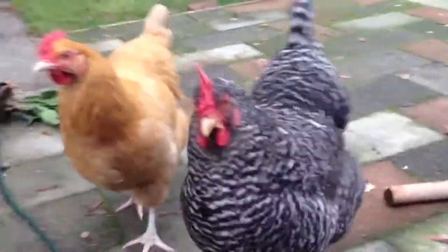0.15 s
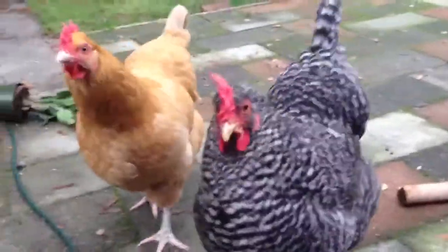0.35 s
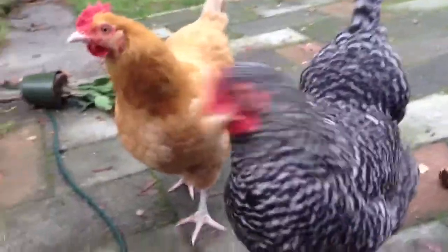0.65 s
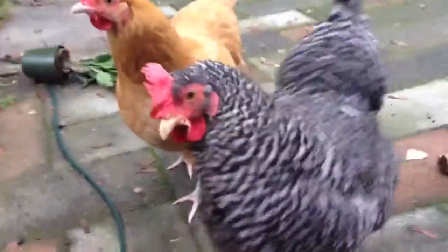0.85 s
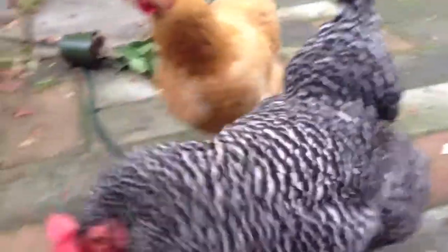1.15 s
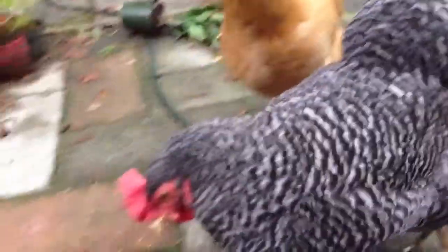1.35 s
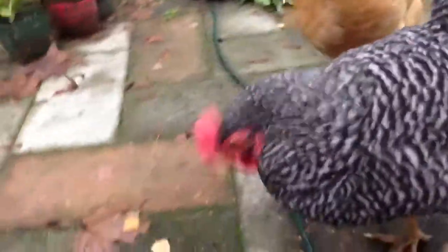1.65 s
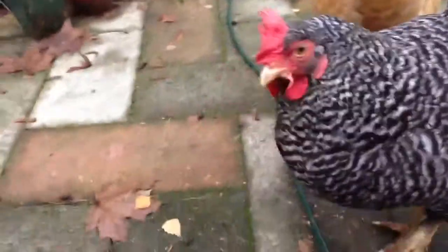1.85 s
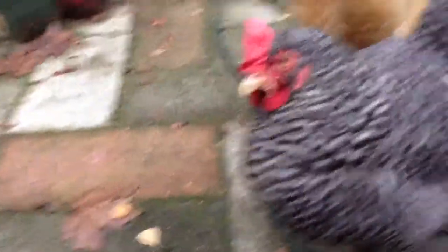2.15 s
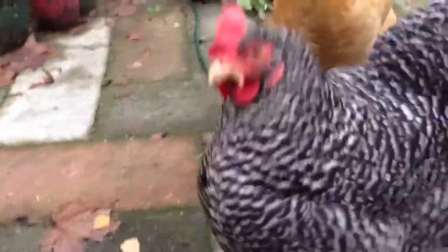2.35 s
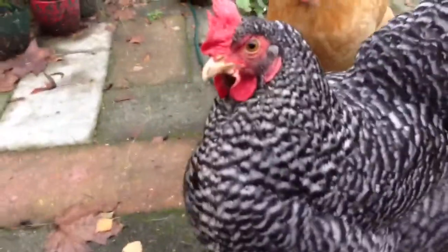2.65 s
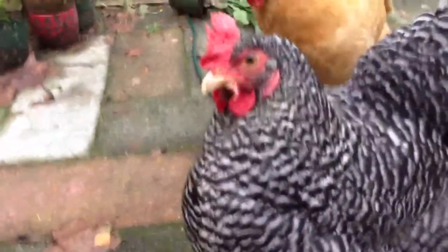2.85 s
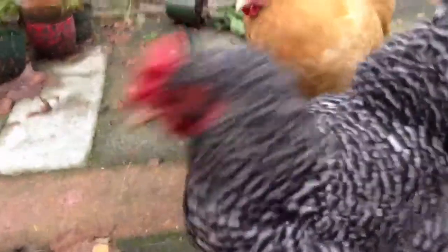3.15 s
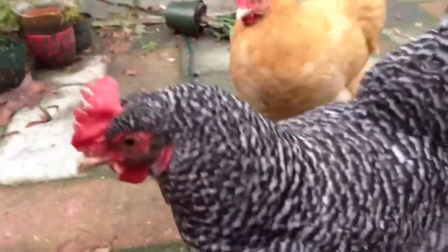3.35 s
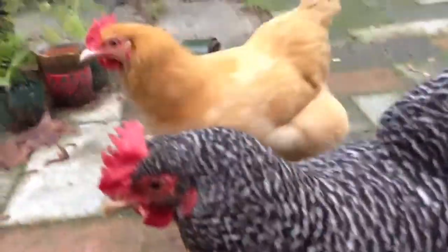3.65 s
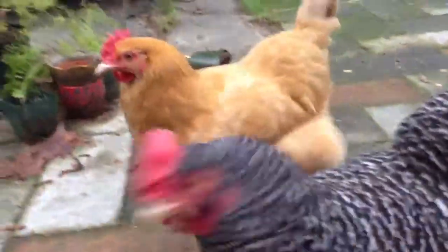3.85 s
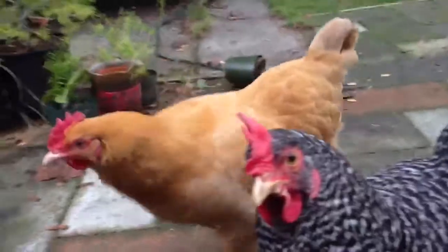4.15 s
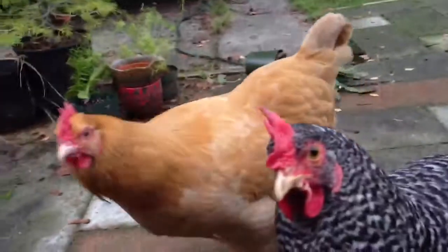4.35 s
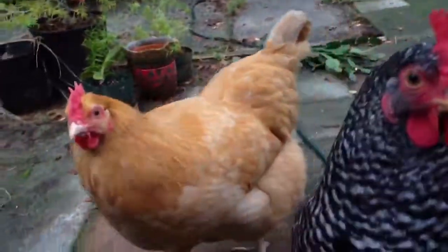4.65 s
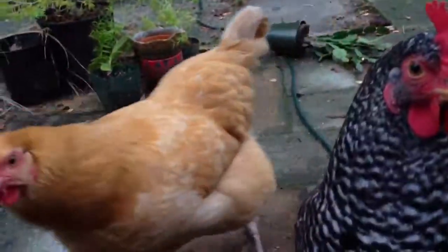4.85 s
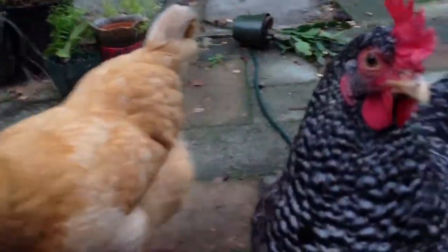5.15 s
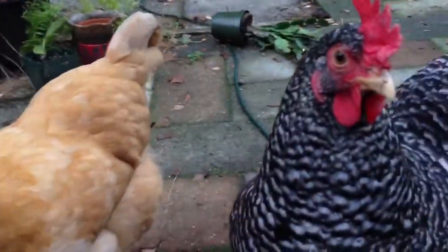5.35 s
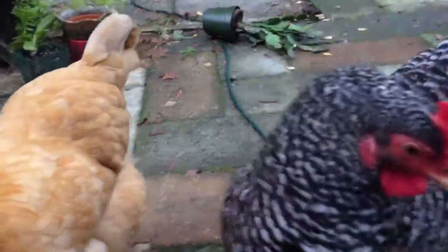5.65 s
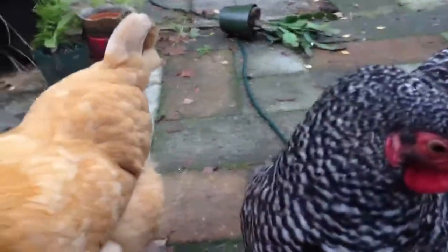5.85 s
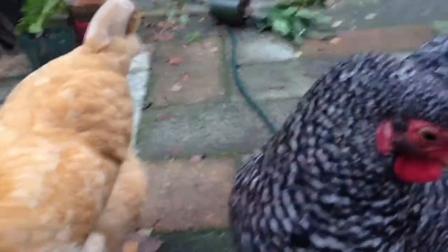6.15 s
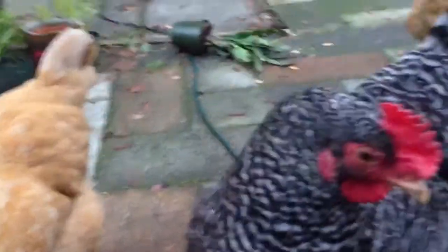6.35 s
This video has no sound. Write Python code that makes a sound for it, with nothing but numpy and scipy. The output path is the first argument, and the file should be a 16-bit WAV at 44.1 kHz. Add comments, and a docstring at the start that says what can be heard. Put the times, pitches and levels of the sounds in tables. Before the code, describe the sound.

A quiet paved garden with a soft, uneven distant rumble and faint hiss; hens are close to the microphone. At 0 s a low hen call is already sounding, slightly wavering, dipping into a purr and breaking back to a clear note by 0.25 s. A soft scuff comes at 0.5 s, crisp ticks near 0.85 and 1.1 s, and a faint rustle around 1.0-1.5 s. From 1.7 to 2.4 s a longer call starts husky and purring, catches, then cracks upward into a clear note with a small closing yelp; ticks cross it. Sparse ticks and tiny far bird notes follow through a calm stretch from 2.5 s, with scuffs and ticks at 4.6-5.2 s and a barely audible whine around 5 s. At 5.65 s air hisses into one very short, loud, sneeze-like squawk, echoing briefly off walls before quiet garden air returns until about 6.4 s.

```python
"""A hen close by gives two low calls, one short and one drawn out, that break between a purr and a clear note;
later comes one sharp, sneeze-like squawk that rings round the yard. Ticks, scuffs, far birds and a soft rumble lie round it.
The voice is pulses and breath from a syrinx, filtered by throat and beak; the squawk drives it hard amid hissing air.
Ticks and scuffs are bursts of band-passed noise, birds are narrow noise on a tone, and the garden is coloured noise."""
import sys
import numpy as np
from scipy import signal
from scipy.fft import rfft, irfft
from scipy.io import wavfile
from scipy.ndimage import uniform_filter1d

SR = 44100
rng = np.random.default_rng(int(sys.argv[2]) if len(sys.argv) > 2 else 0)


def to_wav(s):
    """Save 16-bit WAV."""
    ch = np.atleast_2d(s).T  # columns
    pcm = np.round(np.clip(ch, -1, 1) * 32767)  # PCM
    wavfile.write(sys.argv[1], SR, pcm.astype(np.int16))


N = 286650
TIME = np.arange(N) / SR   # s

# colour of the air rushing out around the squawk: (frequency [Hz], level [dB])
SQUAWK_AIR_COLOUR = [(100, -49.5), (500, -15), (1200, 9), (2200, -5), (3200, -3.5), (5000, 0), (7000, -11),
                     (8500, -8.5), (10300, -22), (13500, -23), (15000, -22.5)]
SQUAWK_S = 5.6615   # when the squawk's voice starts


def from_db(db):
    """Decibels to gain."""
    return 10 ** (np.asarray(db) / 20)


def rms_one(x):
    """Scale to rms 1."""
    return x / np.sqrt(np.mean(x ** 2) + 1e-20)


def in_time(rows):
    """Each column of a curve at every sample."""
    s, *columns = np.transpose(rows)
    return [np.interp(TIME, s, c) for c in columns]


def drift(hz):
    """Random values of spread 1, drawn hz times a second and joined by straight lines."""
    return np.interp(TIME * hz, np.arange(N // 20), rng.standard_normal(N // 20))


def bump(x, centre, width):
    """A bell of height 1 that falls to 1/e at width from its centre."""
    return np.exp(-np.minimum(((x - centre) / width) ** 2, 50))


def envelope(start, end, attack_s, release_s):
    """1 from start to end; rises by 60 dB over the attack before it and falls by 60 dB over the release after it."""
    outside = np.maximum(start - TIME, 0) / attack_s + np.maximum(TIME - end, 0) / release_s
    return from_db(-60 * np.minimum(outside, 4))


def colour(x, spectrum, size=4096):
    """Causal (minimum-phase) filter with the given response."""
    hz, db = np.transpose(spectrum)
    log_hz = np.log(np.fft.rfftfreq(size, 1 / SR) + 1)
    gain = from_db(np.interp(log_hz, np.log(hz), db))
    # folding the cepstrum forward in time gives the minimum phase
    cepstrum = irfft(np.log(gain))
    cepstrum[1:size // 2] *= 2
    cepstrum[size // 2 + 1:] = 0
    response = irfft(np.exp(rfft(cepstrum)))
    return signal.fftconvolve(x, response)[:len(x)]


def band(x, hz, spread):
    """Band-pass from hz / spread to hz * spread."""
    spread = max(spread, 1.01)
    edges = [hz / spread, min(hz * spread, .45 * SR)]
    return signal.sosfilt(signal.butter(2, edges, "band", fs=SR, output="sos"), x)


def evened(x, size=440):
    """Hold the level near rms 1 over a window of size samples, smoothed twice."""
    power = uniform_filter1d(uniform_filter1d(x ** 2, size), size)
    return x / np.sqrt(np.abs(power) + 1e-14)


def whistle(hz, width_hz):
    """A noisy tone: narrow noise carried on a fixed or moving pitch."""
    turn = 2 * np.pi * np.cumsum(hz * np.ones(N)) / SR
    return rms_one(drift(width_hz) * np.sin(turn) + drift(width_hz) * np.cos(turn))


def garden(waver_db=2.0, rumble_db=-0.33, rumble_hz=600, whine_hz=1035):
    """An uneven distant rumble under a steady soft hiss, with a faint narrow whine."""
    # outdoor noise colour: (frequency [Hz], level per Hz [dB])
    garden_colour = [(18, -76.5), (30, -53), (69, -27), (125, -0.5), (185, 1.5), (320, -4.5), (364, -8.5),
                     (460, -7), (735, -14), (1030, -15.5), (1270, -23), (3070, -24), (4650, -22),
                     (6040, -24.5), (15000, -27)]
    garden_db = -60   # rms before the rumble wavers
    lull_s, lull_width_s, lull_db = 4.6, 0.75, 2.5   # the distant rumble sinks for a while
    whine_s, whine_db, whine_rise_s, whine_fade_s = 5.03, -69, 1.7, 1.7   # swells once; rise and fade span 60 dB

    air = rms_one(colour(rng.standard_normal(N), garden_colour)) * from_db(garden_db)
    rumble = signal.sosfilt(signal.butter(1, rumble_hz, fs=SR, output="sos"), air)
    swell = from_db(rumble_db - lull_db * bump(TIME, lull_s, lull_width_s) + waver_db * drift(17))
    whine_swell = envelope(whine_s, whine_s, whine_rise_s, whine_fade_s)
    whine = from_db(whine_db) * whine_swell * whistle(whine_hz, 30)
    return air + rumble * (swell - 1) + whine   # only the rumble's share of the air wavers


def birds(width_hz=450, distance_db=-2):
    """Small far-off birds: faint thin notes of steady pitch, blurred into narrow noise by distance."""
    # far notes: (start [s], length [s], pitch [Hz], level before the distance loss [dB])
    chirps = [(2.591, 0.016, 6820, -64), (2.908, .03, 4360, -67), (3.014, 0.015, 6900, -65),
              (4.1, .25, 3520, -74), (4.216, 0.22, 2940, -79), (4.848, 0.17, 3810, -72.5),
              (5.098, .2, 3640, -73), (6.297, 0.013, 7050, -61)]
    notes = np.zeros(N)
    for s, length, hz, db in chirps:
        swell = np.sin(np.pi * np.clip((TIME - s) / length, 0, 1))
        notes += from_db(db) * swell * whistle(hz, width_hz)
    return from_db(distance_db) * notes


def yard(x, early_t60=0.12, late_t60=0.44, early_db=-14, late_db=-20.5, gap=0.021):
    """A few wall echoes, quick scatter from pots and paving, and a faint longer tail."""
    # colour the yard gives to every echo: (frequency [Hz], level [dB])
    yard_colour = [(200, 2), (500, 1), (1000, -8), (2500, 3), (4000, -2), (6000, -6), (10000, -11)]
    # near walls: (delay [s], level before colouring [dB])
    walls = [(.0125, -17.5), (.019, -19.5), (.034, -20.5)]
    t = TIME[:SR]
    decay = from_db(-60 * t / np.array([[early_t60], [late_t60]]))
    scatter = rng.standard_normal((2, SR)) * decay * (t > gap)
    scatter /= np.linalg.norm(scatter, axis=1, keepdims=True)
    echo = from_db(early_db) * scatter[0] + from_db(late_db) * scatter[1]
    for delay, db in walls:
        echo[round(delay * SR)] += from_db(db)
    return signal.fftconvolve(x, colour(echo, yard_colour))[:N]


def scuffs(spread=1.63, grain_db=5.0):
    """Claws scuffing and feathers rustling: gritty friction that swells quickly and fades."""
    # strokes: (start [s], length [s], level [dB], band centre [Hz])
    strokes = [(0.473, 0.064, -60.5, 3570), (1.02, 0.44, -69.5, 5860), (1.523, 0.074, -67, 6400),
               (4.708, 0.095, -60, 3830), (5.058, 0.049, -59, 4370)]
    out = np.zeros(N)
    for s, length, level_db, hz in strokes:
        grit = rng.standard_normal(N) * from_db(grain_db * drift(640))
        stroke = np.sin(np.pi * np.sqrt(np.clip((TIME - s) / length, 0, 1)))
        out += from_db(level_db) * stroke * rms_one(band(grit, hz, spread))
    return out


def ticks(spread=1.43, size=4096):
    """Beak and claws on stone: each tick is a tiny crack of horn that dies at once."""
    # ticks: (start [s], peak level [dB], band centre [Hz], time to fall by 60 dB [s])
    tick_rows = [(.564, -54, 4880, .037), (.851, -40, 5600, 0.0036), (.861, -46.5, 8040, .014),
                 (1.102, -47, 830, 0.017), (2.005, -46, 6740, 0.016), (2.077, -45, 6420, 0.012),
                 (2.178, -37, 6340, 0.005), (2.223, -48, 4980, 0.013), (2.692, -48, 5224, .025),
                 (3.793, -48, 4100, 0.0082), (4.108, -53.5, 3500, 0.046), (4.592, -46, 4230, 0.0093),
                 (4.708, -46.5, 3860, 0.034), (4.751, -46.5, 4400, .012), (5.061, -46.5, 4500, 0.024),
                 (5.08, -45.5, 4060, .02), (5.18, -45, 6200, 0.0071)]
    out = np.zeros(N + size)
    for s, peak_db, hz, t60 in tick_rows:
        crack = band(rng.standard_normal(size) * from_db(-60 * TIME[:size] / t60), hz, spread)
        at = round(s * SR)
        out[at:at + size] += from_db(peak_db) * crack / np.abs(crack).max()
    return out[:N]


def syrinx(pitch, start=0):
    """Cycle count, one sharp pulse each time the membranes shut, and the puff of turbulent air that follows it."""
    cycles = np.cumsum(pitch) / SR
    cycles = cycles - cycles[round(start * SR)]
    samples_off = (cycles % 1 - .5) * SR / pitch   # distance from the closure
    pulses = np.sinc(samples_off) * np.exp(-(samples_off / 10) ** 2) - pitch / SR
    opening = (.5 + .5 * np.sin(2 * np.pi * cycles - 2.2)) ** 3
    puffs = rng.standard_normal(N) * opening
    return cycles, pulses, rms_one(puffs) * np.sqrt(pitch / SR)


def squawk_air(whistle_width_hz=900):
    """Air hisses out just before the squawk, grows with it and dies after it, with a thin falling whistle inside."""
    lead_s, length_s, attack_s, release_s = .017, 0.047, .003, .06   # attack and release span 60 dB
    air_db, growth_db_per_s = -45.5, 141.5   # level at the start, and its growth
    whistle_hz, sag_hz_per_s, whistle_db, rise_s = 9560, 29000, -49, 0.0095

    start = SQUAWK_S - lead_s
    age = np.clip(TIME - start, 0, length_s)
    hiss = rms_one(colour(rng.standard_normal(N), SQUAWK_AIR_COLOUR))
    rush = from_db(air_db + growth_db_per_s * age) * hiss
    rise = np.minimum(age / rise_s, 1) ** 2
    thin = from_db(whistle_db) * rise * whistle(whistle_hz - sag_hz_per_s * age, whistle_width_hz)
    return envelope(start, start + length_s, attack_s, release_s) * (rush + thin)


def squawk(edge_air=0.45, burst_db=-14):
    """Air drives the syrinx hard for about eleven cycles of sagging pitch, brightest near the middle."""
    # open-beak tone, ringing near 1 kHz: (frequency [Hz], level [dB])
    open_beak_tone = [(40, -60), (300, -26), (500, -15), (780, -21), (950, -4.5), (1020, 1.5), (1100, 0),
                      (1280, -10), (1500, -6.5), (1750, -19.5), (2000, -7.5), (2400, -12.5), (4000, -52.5)]
    # bright edge: (frequency [Hz], level [dB])
    bright_edge = [(100, -57.5), (1500, -20.5), (2500, -23), (3000, 0.5), (3500, -4), (4000, -3.5),
                   (4550, 1.5), (5000, -7), (5900, -8.5), (6600, -35), (9000, -40.5), (11000, -59.5)]
    level_db, start_hz, sag_hz_per_s = -20, 537.7, 3300
    attack_s, hold_s, release_s = 0.00786, 0.0087, 0.0065
    peak_edge_db, edge_loss_db = -1.5, 14.5   # edge against tone at its brightest, and its loss away from there
    edge_peak_s, edge_width_s = 0.0094, .0066   # brightest this long after the start

    corners = np.cumsum([0, attack_s, hold_s, release_s])
    age = np.clip(TIME - SQUAWK_S, 0, corners[-1])
    _, pulses, puffs = syrinx(start_hz - sag_hz_per_s * age, start=SQUAWK_S)
    tone = evened(colour(pulses, open_beak_tone), size=180)
    edge = evened(colour(pulses + edge_air * puffs, bright_edge), size=180)
    edge_db = peak_edge_db - edge_loss_db * (1 - bump(age, edge_peak_s, edge_width_s))
    burst = from_db(burst_db) * rms_one(colour(puffs, SQUAWK_AIR_COLOUR))
    swell = np.interp(age, corners, [0, 1, 1, 0])
    voice = from_db(level_db) * swell * (tone + from_db(edge_db) * edge + burst)
    # a small beak radiates little bass
    return signal.sosfilt(signal.butter(2, 200, "high", fs=SR, output="sos"), voice)


def voice_controls():
    """Pitch and level of the calls, and the slackness, roughness, rasp and gape that follow from them and the breaks."""
    # each call's course: (time [s], pitch [Hz], level before the catches [dB])
    first_call = [(0.0, 348, -24.5), (0.036, 387.3, -29.5), (0.1, 365.5, -29.5), (0.11, 328.6, -34.5),
                  (0.128, 334.2, -30), (0.16, 269.6, -33), (0.182, 278.3, -33.5), (0.198, 391.4, -34),
                  (0.202, 402, -33), (0.226, 375.5, -28), (0.252, 399, -30.5)]
    second_call = [(1.685, 254.2, -46), (1.711, 290.6, -45.5), (1.727, 278.8, -37), (1.743, 250.5, -41),
                   (1.771, 249.2, -30), (1.793, 215.9, -27.5), (1.805, 225.3, -35.5), (1.821, 227.7, -30.5),
                   (1.837, 222.8, -30.5), (1.883, 225.7, -30), (1.911, 252.5, -27.5), (1.961, 234.1, -29.5),
                   (2.049, 230.1, -30.5), (2.073, 256.8, -27.5), (2.101, 242.7, -27), (2.129, 271.8, -26.5),
                   (2.145, 332.9, -31), (2.165, 299.2, -32.5), (2.185, 353, -29), (2.219, 395, -27.5),
                   (2.269, 423.6, -38), (2.287, 405, -26.5), (2.305, 380, -26.5), (2.341, 389.8, -26.5),
                   (2.365, 430.3, -34), (2.371, 520, -34), (2.378, 533, -36.5)]
    # breaks from the purr up to the clear note:
    # (time [s], half length [s], added roughness [0-1], strain before it [dB])
    breaks = [(.213, 0.0275, 0.64, 10.5), (2.129, .034, .85, 8), (2.197, .014, 0.7, 3.5)]
    # the voice catches and the level dips: (time [s], dip [dB])
    catches = [(1.713, 12), (1.802, 13), (1.815, 7)]
    catch_s = 0.0051   # half length
    call_attack_s, call_release_s = 0.01177, 0.0095   # to rise and to fall by 60 dB
    purr_hz, clear_hz, yelp_hz = 245.3, 365.6, 556   # the registers
    calm_rough, purr_rough = 0.1052, .13   # roughness of the clear note, and what the slack purr adds
    croak_rough, croak_s = 0.239, .025   # croaky around a catch: added roughness, half length
    strain_lead_s, strain_s = 0.043, 0.029   # the rasp swells just before each break
    usual_rasp_db, usual_level_db, rasp_per_db = -28.5, -28, 0.53   # rasp against tone; it grows with loudness
    rasp_growth_db, rasp_growth_s = 5.5, .19   # the second call starts smooth and takes on its rasp gradually
    # the beak opens (0-1) between purr and clear note
    gape_rest, gape_wide, gape_hz, gape_span_hz = 0.065, 0.65, 318, 32.2
    gape_yelp, yelp_span_hz, gape_per_rough = 0.46, 59.4, 0.3   # and also in a closing yelp and in a break

    pitch, level_db = in_time(first_call + second_call)
    level_db = level_db - sum(dip_db * bump(TIME, s, catch_s) for s, dip_db in catches)
    sounding = sum(envelope(call[0][0], call[-1][0], call_attack_s, call_release_s)
                   for call in (first_call, second_call))
    slack = np.interp(pitch, [purr_hz, clear_hz], [1, 0])

    breaking = sum(depth * bump(TIME, s, length) for s, length, depth, _ in breaks)
    breaking = breaking + croak_rough * sum(bump(TIME, s, croak_s) for s, _ in catches)
    rough = calm_rough + purr_rough * slack + breaking

    strain_db = sum(db * bump(TIME, s - strain_lead_s, strain_s) for s, _, _, db in breaks)
    fresh = bump(TIME, second_call[0][0], rasp_growth_s)   # the first call is already under way
    rasp_db = usual_rasp_db + rasp_per_db * (level_db - usual_level_db)
    rasp_db = rasp_db + strain_db - rasp_growth_db * fresh

    gape = gape_rest + gape_wide * bump(pitch, gape_hz, gape_span_hz)
    gape = gape + gape_yelp * bump(pitch, yelp_hz, yelp_span_hz) + gape_per_rough * breaking
    return pitch, from_db(level_db) * sounding, slack, np.clip(rough, 0, 1), rasp_db, np.clip(gape, 0, 1)


def calls(jitter=0.1344, shimmer=0.74, air=0.47, top_harmonic=4.11, rasp_waver_db=4.8, quaver_db=1.53,
          purr_body_db=4.5, purr_body_hz=1900):
    """The harmonic nearest the throat resonance leads; cycles turn uneven where the register breaks."""
    # throat with the beak shut, one strong resonance near 720 Hz: (frequency [Hz], level [dB])
    shut_throat = [(40, -72), (140, -15.5), (230, -5.5), (380, -12.5), (480, -8.5), (600, 0), (720, 2.5),
                   (810, -0.5), (940, -12.5), (1150, -20), (1400, -35), (1650, -32.5), (1900, -42),
                   (2300, -54)]
    # beak open: more passes above the resonance and the bass falls away: (frequency [Hz], level [dB])
    open_throat = [(40, -78.5), (250, -21), (400, -24.5), (520, -10), (700, 12.5), (860, -2), (1060, -5),
                   (1250, -10), (1420, -19), (1650, -45), (2300, -51)]
    # the rasp that leaves through the beak: (frequency [Hz], level [dB])
    beak = [(60, -82), (500, -28.5), (1200, -1.5), (1650, -6.5), (1950, -1.5), (2230, -15.5), (2850, -9.5),
            (3100, -3.5), (3400, 4), (3800, -4), (4450, -8.5), (5200, -14.5), (6000, -18.5), (15000, -30)]

    pitch, level, slack, rough, rasp_db, gape = voice_controls()
    flutter = .015 * drift(130)
    cycles, pulses, puffs = syrinx(pitch * np.exp(jitter * rough ** 2 * drift(300) + flutter))
    strength = np.exp(shimmer * rough * drift(350))

    # the airflow is a rounded wave of only four or five strong harmonics
    wave = sum(np.cos(2 * np.pi * k * (cycles - .5)) / (1 + (k / top_harmonic) ** 10) for k in range(1, 8))
    flow = strength * wave * 2 * pitch / SR + air * rough * puffs
    tone = evened((1 - gape) * colour(flow, shut_throat) + gape * colour(flow, open_throat))

    # slack membranes leak more air and shut more softly, so the low purr is huskier and darker
    leak = .28 + .25 * slack + 1.2 * rough
    buzz = strength * pulses + leak * puffs
    soft_lowpass = signal.butter(2, purr_body_hz, fs=SR, output="sos")
    soft = signal.sosfiltfilt(soft_lowpass, strength * pulses + .5 * leak * puffs)
    rasp = evened(colour(buzz + from_db(purr_body_db) * slack * soft, beak))

    quaver = from_db(quaver_db * (.5 + slack) * drift(120))   # the clear note is steadier than the purr
    rasp_gain = from_db(rasp_db + rasp_waver_db * drift(60))
    return level * quaver * (tone + rasp_gain * rasp)


def scene(call_echo_db=-8.0):
    """Calls, ticks and scuffs face the listener and echo less; the squawk goes sideways into the yard."""
    near = calls() + ticks() + scuffs()
    sideways = squawk() + squawk_air()
    echoes = yard(from_db(call_echo_db) * near + sideways)
    return (near + sideways + echoes + birds() + garden())[None]


def record(dry):
    """The top is cut steeply above 15.4 kHz."""
    return signal.sosfilt(signal.ellip(12, .1, 70, 15400, fs=SR, output="sos"), dry)


dry = scene()
out = record(dry)
to_wav(out)
```